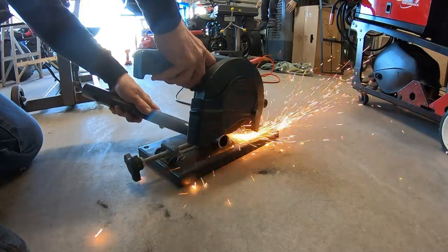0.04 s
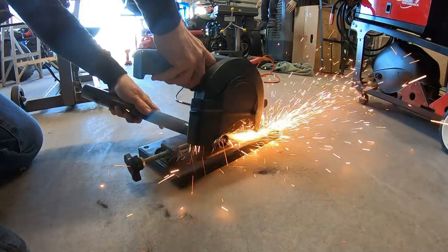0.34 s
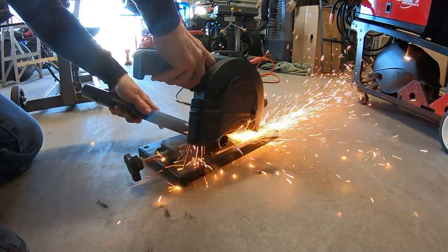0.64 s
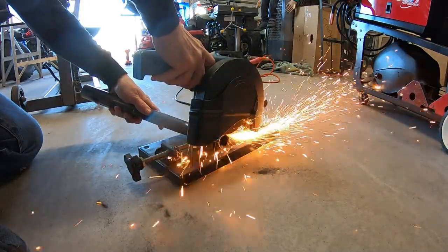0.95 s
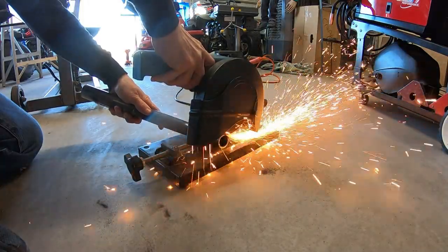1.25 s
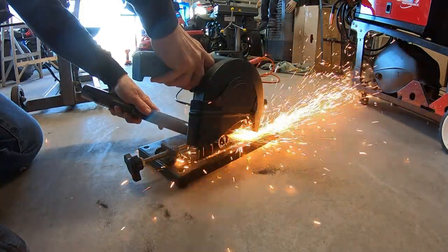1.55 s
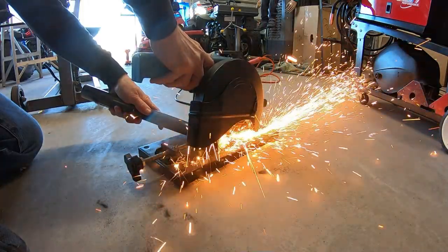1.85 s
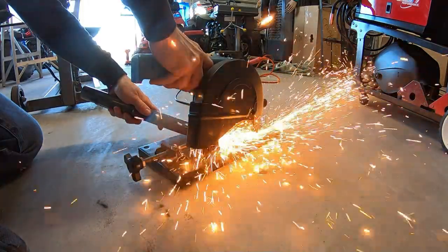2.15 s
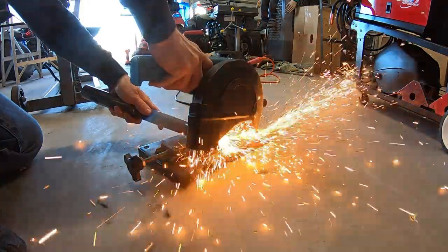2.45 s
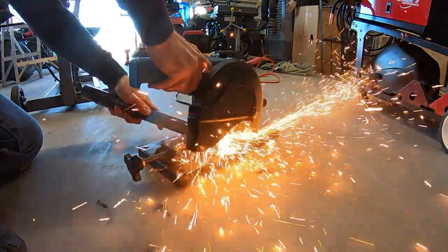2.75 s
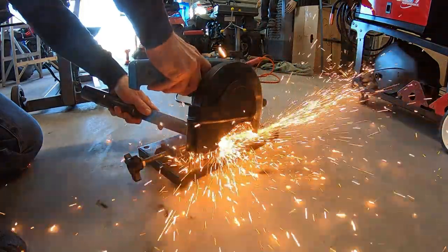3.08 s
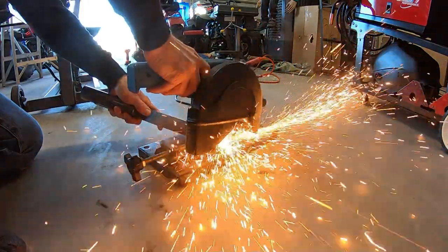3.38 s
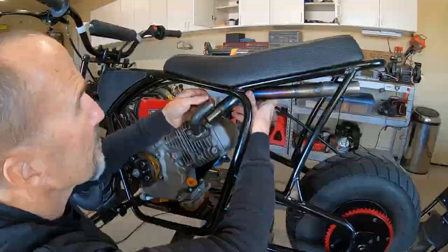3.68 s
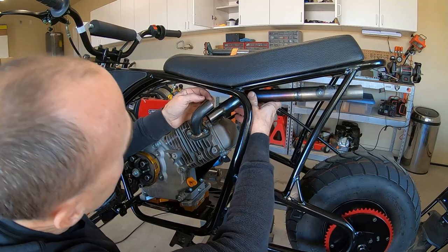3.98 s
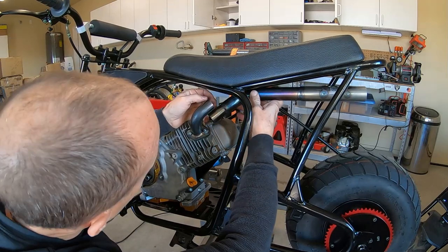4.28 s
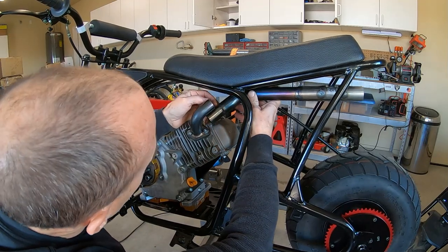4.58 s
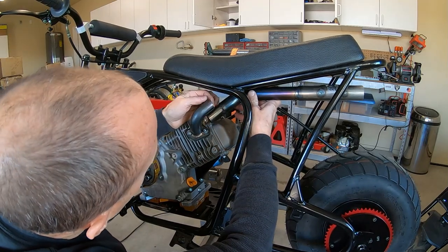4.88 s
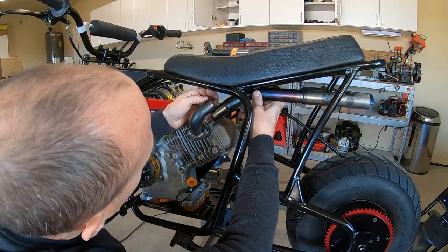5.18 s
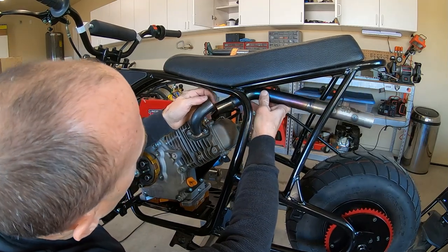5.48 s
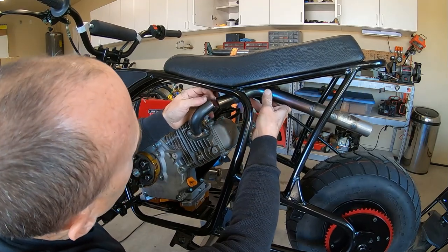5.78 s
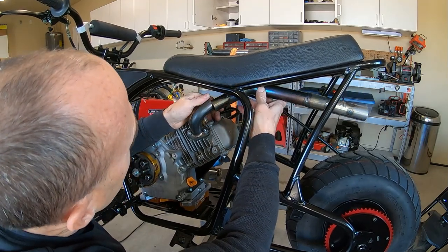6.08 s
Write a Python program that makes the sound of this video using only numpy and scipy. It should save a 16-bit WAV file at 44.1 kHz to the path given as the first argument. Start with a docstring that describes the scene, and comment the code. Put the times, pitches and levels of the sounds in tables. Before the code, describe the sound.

Harsh, gritty grinding fills a workshop as a chop saw bites into steel pipe, with ringing screeches, hissing sparks and a whine that sinks in pitch. A little past halfway it gives way at once to a hushed garage with a faint drone. There a loose metal pipe is fitted to a small bike, making light ringing clinks, soft rubbing and a few dull knocks. Moving air rumbles faintly on the microphone throughout.

```python
"""On a workshop floor, an abrasive chop saw grinds through a steel pipe, slowing under the load.
Its gritty rim repeats a scrape every turn, the wheel squeals, the gears whine and sparks fizz.
Then, all at once, a quiet garage: the pipe clinks, knocks and scrapes against a small bike's engine
and frame, over a low drone and faint hiss. In both places a draught rumbles on the microphone."""
import sys
import numpy as np
from scipy import signal
from scipy.fft import rfft, irfft
from scipy.io import wavfile
from scipy.ndimage import uniform_filter1d, map_coordinates

SR = 44100
rng = np.random.default_rng(int(sys.argv[2]) if len(sys.argv) > 2 else 0)


def to_wav(sig):
    """Store sig (one row per channel, or 1-D mono) as 16-bit WAV at the path in sys.argv[1].

    Samples outside -1..1 are clipped; the rate is SR.
    """
    pcm = np.clip(np.atleast_2d(sig), -1, 1) * 32767
    pcm = np.round(pcm).astype(np.int16)
    wavfile.write(sys.argv[1], SR, pcm.T)  # frames by channels


N = 279153
TIME, FREQS = np.arange(N) / SR, np.fft.rfftfreq(N, 1 / SR)
SHORT_TIME = np.arange(SR // 2) / SR  # half a second, for hits and echoes
SAW_ENDS_S, TREBLE_LIMIT_HZ = 3.657, 15350
GEAR_TEETH, GEAR_SHALLOW_DB, GEAR_DEEP_DB = 37, -41, -42
SQUEAL_GROWTH, EASY_RING_DB = 0.8, -26  # the squeal gains 0.8 dB per dB of ring above an easy cut

# The wheel slows as it bites and picks up when the push eases. Each row: seconds, turns per second.
WHEEL_SPEED = [(0.0, 121.6), (0.28, 118.4), (0.48, 113.1), (0.58, 111.3), (0.75, 107.5), (1.04, 105.8),
               (1.36, 99.7), (1.6, 97.2), (2.0, 91.5), (2.26, 89.2), (2.4, 90.2), (2.68, 90.3),
               (2.88, 88.3), (2.97, 88.3), (3.1, 93.2), (3.32, 93.1), (3.52, 88.8), (3.65, 88.1)]
# How far the cut has gone. Each row: seconds, depth from 0 (shallow) to 1 (deep).
CUT_DEPTH = [(0, 0.01), (1.4, 0.3), (2.2, 0.6), (3.0, 0.85), (3.65, 1)]
# The saw's loudness. Each row: seconds, then grinding, wheel ring, spark fizz and saw body in dB.
SAW_LEVELS = [(0.0, -23, -25, -41.5, -30), (0.06, -21, -27, -38.5, -28.5),
              (0.22, -22.5, -23.5, -41.5, -33.5), (0.96, -21.5, -28.5, -39.5, -35),
              (1.23, -21.5, -25.5, -40.5, -38.5), (1.4, -22, -28.5, -38.5, -35),
              (1.83, -21.5, -30.5, -38, -37.5), (2.3, -20, -21, -34, -31), (2.41, -21.5, -20.5, -33, -32.5),
              (2.9, -21, -20.5, -43.5, -35.5), (3.03, -22, -19, -43.5, -33.5),
              (3.36, -19, -20.5, -37, -33.5), (3.64, -22.5, -19.5, -42, -34)]
# The tone colours of a shallow cut, a deep cut and the saw's body. Each row: frequency in Hz, level in dB.
SHALLOW_COLOUR = [(1400, -12.5), (1650, -3), (1900, 3.5), (2300, -4), (2700, -11), (3200, -8), (4100, -7),
                  (5200, -13.5), (7000, -4), (8500, -9.5), (9600, -11.5), (10300, -17.5), (12700, -15),
                  (15000, -24)]
DEEP_COLOUR = [(1400, -16), (1600, -11), (1900, -4), (2300, -11), (2600, -20), (3400, -11), (4300, -14.5),
               (6800, -11), (9700, -14), (10300, -20), (12500, -18.5), (15000, -30)]
BODY_COLOUR = [(53, -39.5), (90, -9.5), (151, -17.5), (225, -11), (321, -20.5), (397, -9), (496, -13),
               (635, 0), (776, -4.5), (982, -9), (1300, -7.5), (1450, -9), (1500, -7), (1950, -33),
               (3300, -120)]
# Where wheel, guard and pipe ring. Each row: pitch in Hz, width in Hz, shallow and deep boost in dB.
RESONANCES = [(1317, 92, 15, 10.5), (1820, 110, 2.5, 1.5), (2242, 57, -5.5, 7.5), (2600, 91, 0, 8),
              (2823, 110, 4.5, 7.5), (3340, 300, -2, 7), (3745, 88, 9, 4.5), (4260, 150, -0.5, 2.5),
              (4876, 240, 5.5, 6.5), (5502, 150, 4.5, 8.5), (6030, 250, 7, 5), (6320, 360, -1.5, -1),
              (6730, 150, 2, 5.5), (7070, 160, -2.5, 3.5), (7790, 160, 4.5, 6.5), (7930, 82, 3, -1.5),
              (8200, 220, -2.5, -1.5), (8800, 96, -4, 5.5), (9060, 290, 7, 3.5), (9360, 170, 1, 8.5)]
# The wheel catches and screeches. Each row: start and end in seconds, pitch and width in Hz, level in dB.
SCREECHES = [(1.25, 1.95, 3740, 200, -35.5), (1.7, 2.1, 2920, 110, -43), (1.1, 2.0, 8900, 250, -34),
             (1.9, 2.122, 5490, 110, -34), (1.1, 3.2, 8450, 400, -37), (2.3, 2.852, 3300, 160.8, -40.5),
             (2.716, 3.3, 2900, 109, -33.5), (2.6, 3.5, 4900, 150, -34), (2.72, 2.8, 8500, 110, -38),
             (2.4, 3.384, 6620, 250, -40.5), (2.97, 3.5, 3440, 60, -34.5), (3.8, 3.62, 12000, 150, -40)]
# The squeals and weaker tones, as multiples of the wheel speed. The fractions come from the geared motor.
SQUEAL_MULTIPLES = (18, 19, 20, 21)
WEAK_MULTIPLES = (1, 2, 3, 5, 6, 11, 12, 37 / 3, 16, 17, 37 / 2, 22, 24, 74 / 3, 31, 33, 53, 55)
# Their loudness, in the same order. Each row: dB in a shallow cut, dB in a deep cut.
SQUEAL_LEVELS = [(-39.5, -50), (-34, -50), (-46, -45.5), (-37.5, -42)]
WEAK_LEVELS = [(-63, -67), (-52, -63.5), (-57, -60), (-41.5, -67.5), (-35, -56), (-58, -55), (-48, -47.5),
               (-63.5, -64), (-40, -57), (-38, -46.5), (-54.5, -37.5), (-49.5, -40.5), (-41.5, -38.5),
               (-45, -37), (-55, -51), (-61.5, -43.5), (-64.5, -46.5), (-55, -47)]
# Pitches in Hz where the wheel or pipe makes a passing tone sing out.
SINGING_HZ = (1625, 1768, 1850, 1890, 1981, 2022, 2088, 2170, 2235, 3443, 3753, 3925, 4157, 4372)
# Their shapes, in the same order. Each row: width in Hz, boost in dB.
SINGING_PEAKS = [(33, 12), (18, 15), (50, 15), (17, 6), (30, 4), (40, 10), (30, 4), (63, 7), (36, 8),
                 (44, 6), (90, 14), (110, 9), (170, 17), (72, 11)]
# How alike the saw is on the left and right. Each row: frequency in Hz, likeness (1 or more is identical).
SAW_LIKENESS = [(60, 1.2), (92, -0.07), (140, 0.05), (210, 0.73), (330, 0.8), (500, 1.05), (770, 0.93),
                (1170, 0.13), (1790, 0.1), (2740, 0.85), (4190, 1.3), (6410, 0.48), (9810, -0.02),
                (15000, 1)]
# How far the left wave leads the right. Each row: frequency in Hz, phase in radians.
SAW_PHASE = [(0, 0), (600, -0.32), (1290, 1.3), (1550, -0.22), (2150, -0.1), (4910, 0.1), (5600, 0.8),
             (5940, -0.63), (6800, 1.15), (7490, -1.1), (7840, 0.9), (8500, 1.3), (8870, 0.5), (9650, -1.2),
             (10900, 1.5), (15000, 0.2)]
# Which side is louder. Each row: frequency in Hz, left minus right in dB.
SAW_BALANCE = [(60, -3), (87, -3.0), (130, -3), (180, -1.0), (260, -1), (380, 1), (550, -1.5), (790, -2),
               (1140, -1.5), (1650, -3.5), (2380, 2.5), (3440, -0.5), (4970, 0.5), (7180, -2),
               (10400, -2.0), (15000, -1.0)]
# Everything in the workshop, saw and draught alike, narrows to nearly mono. Each row: seconds, gain of the
# stereo spread in dB.
STEREO_WIDTH = [(1.85, 1.5), (2.2, -7), (2.65, -18), (2.85, -35.5), (3.65, -32)]

# The pitches in Hz at which the loose pipe rings, some in close pairs.
PIPE_HZ = (549, 668, 985, 1331, 1362, 1583, 2013, 2296, 2311, 2557, 2574, 3295, 3941, 5575, 5604, 6045,
           6700, 7014, 7090, 7542)
# Their strengths, in the same order. Each row: level in dB, seconds to fade 60 dB if no hand damps it.
PIPE_RING = [(-10, .3), (5.5, .26), (-8, .23), (0, 0.36), (-5.5, 0.3), (-10, 0.38), (-13, .3), (-14, 0.39),
             (-22, .6), (-5.5, 0.65), (-7.5, 0.52), (-28, 0.62), (-17, 0.49), (-7, 0.29), (-6, 0.37),
             (-10, .35), (-10, .25), (-11.5, 0.4), (-14, .22), (-14, .25)]
# Steel hits steel. Each row: start in seconds, level in dB, then ring, dull body and bright edge in dB.
CLINKS = [(4.048, -55, 1, -11, 1), (4.0823, -45, -7, -8, -5), (4.104, -36.5, -7, -9, -4),
          (4.1468, -39.5, 4.5, -21, -24), (4.337, -47.5, -8, -15, -11), (4.4135, -41, 1.5, -16, -9),
          (4.4398, -40.5, 1, -12, -13), (4.4974, -22.5, -6.5, -28, -17), (4.5154, -30, -1, -8, -36),
          (5.0574, -38, -11.5, 5, -20), (5.1498, -42, -13, -14, -13), (5.5574, -55.5, -4, -3, -7),
          (5.8898, -63.5, -1, 1, -15), (6.0776, -36, -16, -17, -24), (6.0934, -50, -6, -10.5, -10.5),
          (6.1396, -42, -1.5, -10, -8)]
# The pipe bumps the frame. Each row: start in seconds, level in dB, ring in dB relative to that level.
KNOCKS = [(6.025, -34, -23), (6.030, -42, -16), (6.043, -38.5, -13.5), (6.140, -52, 9.5),
          (6.227, -38, -11.5), (6.231, -46, -11.5)]
# The frame's tubes ring. Each row: pitch in Hz, level in dB, seconds to fade 60 dB.
FRAME_MODES = [(210, -17, 0.11), (408, -4, 0.15), (1065, -4, 0.09), (1353, -15, .1), (1564, -18, .12)]
# The pipe is pushed and twisted. Each row: peak time, rise, hold and fall in seconds, scrape and rub in dB.
STROKES = [(4.113, 0.4, 0.066, 0.22, -58.5, -62), (4.33, .25, .02, .25, -73, -67.5),
           (4.418, .04, .01, 0.19, -60, -57.5), (4.498, 0.018, .002, 0.061, -47, -57),
           (4.518, .05, .03, 0.79, -82, -60), (4.77, .25, .005, 0.2, -79, -68),
           (5.058, .03, .002, 0.099, -63, -55), (5.09, .2, 0.13, 1.2, -80, -61),
           (5.56, .6, 0.036, 0.23, -87, -76), (5.9, .1, 0.011, 0.15, -83, -66.5),
           (5.99, .15, .04, .3, -88.5, -75), (6.079, .02, .003, 0.23, -57, -58)]
# It squeaks in its seat. Each row: start and end in seconds, pitch and width in Hz, level in dB.
SQUEAKS = [(5.192, 5.26, 6100, 250, -76), (5.15, 5.42, 4500, 1200, -77), (5.885, 5.93, 6060, 400, -79),
           (5.975, 6.02, 3620, 1100, -67)]
# The tone colours of the four kinds of contact. Each row: frequency in Hz, level in dB.
CLINK_COLOUR = [(250, -21), (400, -17), (663, 2), (1100, -8), (1400, -6), (1850, -11), (2400, -2.5),
                (2750, -6.5), (3200, -31), (5500, -7), (6400, -16), (7000, -2), (8200, -18), (9500, -40)]
KNOCK_COLOUR = [(41, -30.5), (70, -1.5), (210, -1), (450, -15), (1200, -16), (1650, -24), (1980, -18),
                (2300, -26), (3500, -36), (6000, -44), (10000, -65)]
SCRAPE_COLOUR = [(240, -36), (400, -8), (579, 0), (850, -18.5), (1320, -6), (2180, -26), (2650, 8),
                 (3240, -31), (4430, -28), (5730, 3), (6420, -23), (6990, -10), (12000, -53.5),
                 (15600, -80), (22000, -120)]
RUB_COLOUR = [(240, -30), (400, 0), (650, -7), (1150, -5.5), (2500, -14), (4500, -22), (5500, -25.5),
              (9300, -27), (10500, -48), (14000, -65.5)]

# The garage's echo. Each row: frequency in Hz, seconds to fade 60 dB.
GARAGE_FADE = [(150, 0.27), (1000, 0.84), (3000, 0.5), (8000, 0.31)]
# The tone colours of the garage air and the draught. Each row: frequency in Hz, level in dB.
AIR_COLOUR = [(59, -55), (100, -21.5), (175, 1.5), (243, -6), (293, -24.5), (391, -21), (425, -29.5),
              (580, -31), (743, -22.5), (1030, -34.5), (3090, -52.5), (4400, -50.5), (5300, -53),
              (9450, -57.5), (14000, -69)]
RUMBLE_COLOUR = [(9, -25.5), (15, 2.5), (35, -5), (77, -5.5), (130, -17), (180, -27.5), (240, -45),
                 (400, -100)]
# How alike the air is on the left and right. Each row: frequency in Hz, likeness from 0 to 1.
AIR_LIKENESS = [(60, 0.88), (150, 1), (380, 0.83), (950, 0.22), (2380, 0.27), (5980, 0.4), (15000, 0.02)]
# The air's loudness. Each row: seconds, drone in dB, hiss in dB.
AIR_LEVELS = [(3.7, -63, -64), (4.4, -61, -65.5), (4.8, -61, -62.5), (4.97, -54, -60), (5.27, -55, -63),
              (5.4, -58.5, -61.5), (5.75, -59.5, -64.5), (5.98, -61, -62.5), (6.1, -58, -63.5),
              (6.33, -54.5, -61.5)]
# The draught's strength. Each row: seconds, level in dB.
DRAUGHT_LEVELS = [(0, -60), (3.4, -52.5), (5.0, -57), (5.7, -62), (6.3, -54.5)]
# Single puffs of air. Each row: middle and length in seconds, level in dB, left minus right in dB.
GUSTS = [(1.823, 0.41, -41, -10), (1.982, 0.18, -57, 2), (2.098, 0.1, -49, -9), (2.262, 0.091, -41, 7),
         (2.83, 0.32, -43.5, 3), (3.73, 0.28, -43.5, -16), (4.019, 0.36, -42, -14), (4.32, 0.23, -43, -9),
         (4.5, 0.17, -48, -3), (4.757, 0.35, -47, 0), (6.278, .2, -50, -7)]


def saw():
    """The turning wheel sets the pace of both the grinding and the whining."""
    speed = curves(WHEEL_SPEED)[0]
    turns = np.cumsum(speed) / SR
    depth = np.clip(curves(CUT_DEPTH)[0], 0, 1)
    grind_db, ring_db, fizz_db, body_db = curves(SAW_LEVELS)
    tones = whine(speed, turns, depth, ring_db)
    grit = grinding(turns, depth, grind_db, ring_db, fizz_db, body_db)
    return workshop_echo(grit + spread(tones), wet_db=-11.5, fade_s=.4)


def grinding(turns, depth, grind_db, ring_db, fizz_db, body_db):
    """The rim's scrape sounds through the saw's body, the wheel and the pipe; sparks fizz on top."""
    scrape = spread(pair(*rim(turns, wear_turns=10, fresh=.6, uneven_db=2.2), SAW_LIKENESS))
    hiss = spread(pair(*rng.standard_normal((2, N)), SAW_LIKENESS))
    shallow = colour(irfft(rfft(scrape) * amp(resonance_db(FREQS, 0)), N), SHALLOW_COLOUR)
    deep = colour(irfft(rfft(scrape) * amp(resonance_db(FREQS, 1)), N), DEEP_COLOUR)
    steel = (1 - depth) * unit(shallow) + depth * unit(deep)
    sparks = steel + 0.39 * unit(colour(hiss, DEEP_COLOUR))
    bite = amp(.6 * wander(70) + 0.32 * wander(900))  # the grit catches unevenly
    grind = amp(grind_db - 1.57) * steady(band(steel, 2450, 10090))
    wheel_ring = amp(ring_db - 4.8 - 2.5 * depth) * steady(band(steel, 1480, 2450))
    fizz = amp(fizz_db - 1.45) * steady(band(sparks, 10000, 16000))
    body = amp(body_db - 2) * band(colour(scrape + 0.99 * hiss, BODY_COLOUR), 100, 1480)
    return bite * (grind + wheel_ring + fizz + swells(scrape, SCREECHES)) + body


def rim(turns, wear_turns, fresh, uneven_db, points=1024, harmonics=180):
    """The same grit passes once a turn and slowly wears; breaking grains add fresh noise."""
    kept_per_turn = np.exp(-1 / wear_turns)
    grit = rng.standard_normal((2, 512, harmonics, 2)) @ [1, 1j]  # two spectra for each of 512 turns
    worn = signal.lfilter([1], [1, -kept_per_turn], grit, axis=1)
    # as the contact shifts, groups of high overtones flare and fade
    flare = uniform_filter1d(rng.standard_normal((512, harmonics)), 16, axis=0)
    flare = unit(uniform_filter1d(flare, 2, axis=1))
    worn *= amp(uneven_db * flare * np.minimum(np.arange(harmonics) / 70, 1))
    surfaces = irfft(worn[:, 64:], points).reshape(2, -1)  # the rim's bumps, turn after turn
    scrape = np.array([map_coordinates(s, [turns * points], order=1, mode="wrap") for s in surfaces])
    return unit(scrape) + fresh * rng.standard_normal((2, N))


def whine(speed, turns, depth, ring_db):
    """Wheel squeal, gear whine and weaker tones swell as their pitch slides through a resonance."""
    push_db = SQUEAL_GROWTH * (ring_db - EASY_RING_DB)
    tones = np.zeros(N)
    for multiple, (shallow, deep) in zip(SQUEAL_MULTIPLES, SQUEAL_LEVELS):
        db = shallow + depth * (deep - shallow) + push_db + singing_db(multiple * speed)
        tones += tone(turns, multiple, db, flutter_db=1.3, jitter_rad=.25)
    gear_db = GEAR_SHALLOW_DB + depth * (GEAR_DEEP_DB - GEAR_SHALLOW_DB) + singing_db(GEAR_TEETH * speed)
    tones += tone(turns, GEAR_TEETH, gear_db, flutter_db=2, jitter_rad=.45)  # one wave per tooth
    for multiple, (shallow, deep) in zip(WEAK_MULTIPLES, WEAK_LEVELS):
        boost_db = np.interp(TIME, TIME[::256], resonance_db(multiple * speed[::256], depth[::256]))
        db = shallow + depth * (deep - shallow) + boost_db - 1.5
        tones += tone(turns, multiple, db, flutter_db=2.5, jitter_rad=.39)
    return tones


def tone(turns, multiple, db, flutter_db, jitter_rad):
    """One slightly shaky tone at a multiple of the wheel speed."""
    gain = np.sqrt(2) * amp(db + flutter_db * wander(35))
    return gain * np.sin(2 * np.pi * (multiple * turns + rng.random()) + jitter_rad * wander(22))


def resonance_db(hz, depth):
    """The steel favours some pitches, and their boost changes as the cut deepens."""
    return sum((shallow + depth * (deep - shallow)) / (1 + (2 * (hz - centre) / width) ** 2)
               for centre, width, shallow, deep in RESONANCES)


def singing_db(hz):
    """The boost a tone gets near a narrow resonance of the wheel or pipe."""
    return sum(db / (1 + (2 * (hz - centre) / width) ** 2)
               for centre, (width, db) in zip(SINGING_HZ, SINGING_PEAKS))


def swells(x, rows):
    """Screeches and squeaks: for a moment, one resonance picks its band out of x and sings."""
    out = np.zeros(x.shape)
    for start, end, centre, width, db in rows:
        narrow = irfft(rfft(x) / (1 + (2 * (FREQS - centre) / width) ** 4), N)
        part = narrow[..., round(start * SR):round(max(end, start + .02) * SR)]
        add(out, start, amp(db) * unit(part) * signal.windows.tukey(part.shape[-1], .5))
    return out


def pipe_on_bike():
    """The pipe clinks on steel, knocks on the frame and slides in its seat."""
    hits = np.zeros(N)
    pipe = [(hz, db, fade_s) for hz, (db, fade_s) in zip(PIPE_HZ, PIPE_RING)]
    for start, db, ring_db, body_db, edge_db in CLINKS:
        hardness = [(700, 0.59 * min(body_db, 3)), (1500, 0), (3000, 0), (5500, 0.55 * (edge_db + 1.5))]
        contact = burst([(hz, level + read(hardness, hz)) for hz, level in CLINK_COLOUR], fade_s=0.05)
        modes = [(hz, level + read(hardness, hz), fade_s) for hz, level, fade_s in pipe]
        clink = amp(-4) * contact + amp(ring_db - 11.5) * ring(modes, damping=1.15)
        add(hits, start, amp(db - 7) * clink)
    for start, db, ring_db in KNOCKS:
        knock = burst(KNOCK_COLOUR, fade_s=0.031) + amp(ring_db) * ring(FRAME_MODES, damping=1)
        add(hits, start, amp(db) * knock)
    scrape, rub = sliding(pipe)
    return signal.sosfilt(signal.butter(6, 8800, fs=SR, output="sos"), hits + scrape) + rub


def burst(spectrum, fade_s):
    """A short contact: noise that starts at once and dies away."""
    noise = unit(colour(rng.standard_normal(len(SHORT_TIME)), spectrum))
    return noise * amp(-60 * SHORT_TIME / fade_s) * np.minimum(SHORT_TIME / 0.00067, 1)


def ring(modes, damping):
    """Struck steel rings at its own pitches (modes), never quite the same; hands damp it."""
    return sum(amp(db + rng.normal(0, 1.1) - 60 * damping * SHORT_TIME / fade_s)
               * np.sin(2 * np.pi * (hz * SHORT_TIME + rng.random())) for hz, db, fade_s in modes)


def sliding(pipe):
    """Tiny uneven slips make a ringing scrape and a dry rub with faint squeaks."""
    pushes = np.array([stroke(*row[:4]) for row in STROKES])
    scrape_gain, rub_gain = amp(np.array(STROKES)[:, 4:].T) @ pushes
    slips = rng.standard_normal(N) * amp(1.6 * wander(250))
    ringing = unit(signal.oaconvolve(np.diff(slips, prepend=0), ring(pipe, damping=1.7))[:N])
    scrape = scrape_gain * unit(ringing + 0.57 * unit(colour(slips, SCRAPE_COLOUR)))
    rub = rub_gain * unit(colour(slips, RUB_COLOUR)) + swells(slips, SQUEAKS)
    return scrape, rub


def stroke(peak_s, rise_s, hold_s, fall_s):
    """The loudness of one push: it climbs 60 dB in rise_s, holds, then drops 60 dB in fall_s."""
    before, after = np.maximum(peak_s - TIME, 0), np.maximum(TIME - peak_s - hold_s, 0)
    return amp(-60 * (before / rise_s + after / fall_s))


def workshop_echo(x, wet_db, fade_s):
    """Floor, benches and machines scatter the sound differently to each side."""
    tail = rng.standard_normal((2, len(SHORT_TIME))) * amp(-60 * SHORT_TIME / fade_s) * (SHORT_TIME > .003)
    return x + amp(wet_db) * signal.fftconvolve(x, tail / np.linalg.norm(tail[0]), axes=1)[:, :N]


def garage_echo(x, wet_db):
    """Adds a soft echo on each side, in which the middle pitches last longest."""
    hz, t, noise = signal.stft(rng.standard_normal((2, SR // 2)), SR, nperseg=256)
    fade = amp(-60 * t / read(GARAGE_FADE, hz)[:, None]) * (t > .004)
    tail = signal.istft(noise * fade, SR, nperseg=256)[1]
    echo = signal.fftconvolve(x[None], tail / np.linalg.norm(tail[0]), axes=1)[:, :N]
    return (x + amp(wet_db) * echo) * amp([[-.5], [.5]])  # leans a little to the right


def garage_air():
    """The garage's low drone and faint hiss."""
    drone_db, hiss_db = curves(AIR_LEVELS)
    noise = colour(pair(*rng.standard_normal((2, N)), AIR_LIKENESS), AIR_COLOUR)
    return amp(drone_db + 2) * band(noise, 110, 310) + amp(hiss_db - 1) * band(noise, 310, 15000)


def draught(lumps_db=2, lumps_per_s=9):
    """Restless air rumbles on the microphone; stronger puffs mostly land on one side."""
    lumps = np.array([wander(lumps_per_s), wander(lumps_per_s)])
    gain = amp(curves(DRAUGHT_LEVELS)[0] + lumps_db * lumps)
    for middle_s, length_s, db, pan_db in GUSTS:
        sides = amp(np.array([[pan_db], [-pan_db]]) / 2)
        swell = np.cos(np.pi * np.clip((TIME - middle_s) / length_s, -.5, .5))
        gain = np.hypot(gain, amp(db) * swell * sides / sides.mean())
    noise = pair(*rng.standard_normal((2, N)), likeness=[(20, 0.37), (120, 0.9)])
    return gain * unit(colour(noise, RUMBLE_COLOUR))


def pair(a, b, likeness):
    """Turns two unrelated signals into a partly alike left and right."""
    same = np.clip(read(likeness, FREQS), 0, 1)
    return np.array([a, irfft(same * rfft(a) + np.sqrt(1 - same ** 2) * rfft(b), N)])


def spread(x):
    """Each pitch reaches left and right with its own level and phase."""
    left = amp(read(SAW_BALANCE, FREQS) / 2) * np.exp(.5j * read(SAW_PHASE, FREQS))
    sides = np.array([left, 1 / left])
    return irfft(rfft(x) * sides / np.maximum(abs(sides.mean(0)), .6), N)


def narrowed(x):
    """Draws left and right towards the middle over time."""
    middle = x.mean(0)
    return middle + amp(curves(STEREO_WIDTH)[0]) * (x - middle)


def amp(db):
    """Turns decibels into a gain."""
    return 10 ** (np.asarray(db) / 20)


def unit(x):
    """Scales to an average (rms) level of 1."""
    return x / np.sqrt(np.mean(x ** 2) + 1e-20)


def steady(x):
    """Evens out slow changes in level, so the push on the saw sets the loudness, not the grit."""
    return x / np.sqrt(uniform_filter1d(x.mean(0) ** 2, SR // 15) + 1e-9)


def read(points, hz):
    """Looks up a value between a table's rows, on a log-frequency scale."""
    freqs, values = np.transpose(points)
    return np.interp(np.log(hz + 1), np.log(freqs + 1), values)


def curves(rows):
    """Turns each column of a timed table into one value per sample."""
    seconds, *columns = np.transpose(rows)
    return [np.interp(TIME, seconds, column) for column in columns]


def add(mix, start_s, sound):
    """Mixes a sound in at its start time."""
    part = mix[..., round(start_s * SR):][..., :sound.shape[-1]]
    part += sound[..., :part.shape[-1]]


def colour(x, spectrum):
    """Turns each frequency up or down to follow a tone colour."""
    size = x.shape[-1]
    return irfft(rfft(x) * amp(read(spectrum, np.fft.rfftfreq(size, 1 / SR))), size)


def band(x, lo_hz, hi_hz):
    """Keeps one range of frequencies, scaled so the average of left and right has level 1."""
    hz = FREQS + 1
    kept = irfft(rfft(x) / np.sqrt((1 + (lo_hz / hz) ** 32) * (1 + (hz / hi_hz) ** 32)), N)
    return kept / np.std(np.atleast_2d(kept).mean(0))


def wander(rate):
    """A smooth random wobble of level 1, changing about rate times a second."""
    knots = signal.resample_poly(rng.standard_normal(4096), 4, 1)
    return unit(np.interp(TIME * rate * 4, np.arange(len(knots)), knots))


def scene():
    """The saw, then at once the quiet garage, with the draught under both."""
    sawing = np.clip((SAW_ENDS_S - TIME) / 0.00405 + .5, 0, 1)
    rumble = draught()
    workshop = narrowed(saw() + rumble)
    garage = garage_echo(pipe_on_bike(), wet_db=-5) + garage_air() + rumble
    return sawing * workshop + (1 - sawing) * garage


def record(dry):
    """Removes the very highest treble."""
    lowpass = signal.firwin(301, TREBLE_LIMIT_HZ, window=("kaiser", 9), fs=SR)
    return signal.oaconvolve(dry, lowpass[None], "same")


dry = scene()
out = record(dry)
to_wav(out)
```